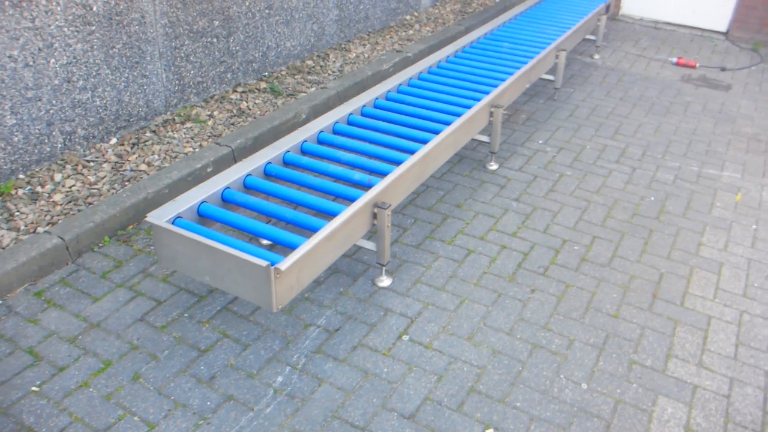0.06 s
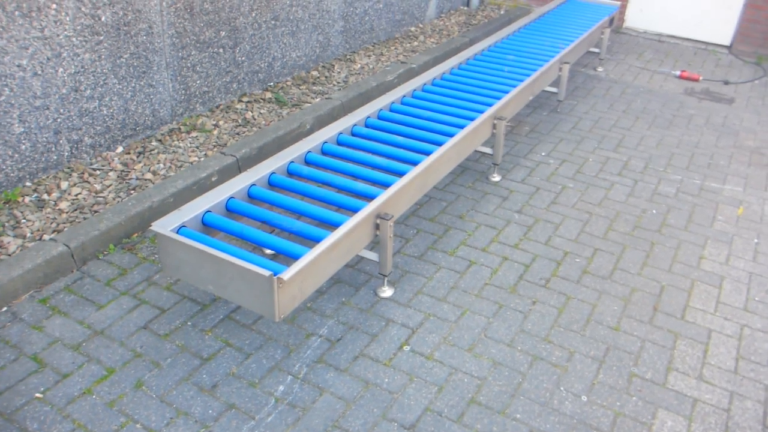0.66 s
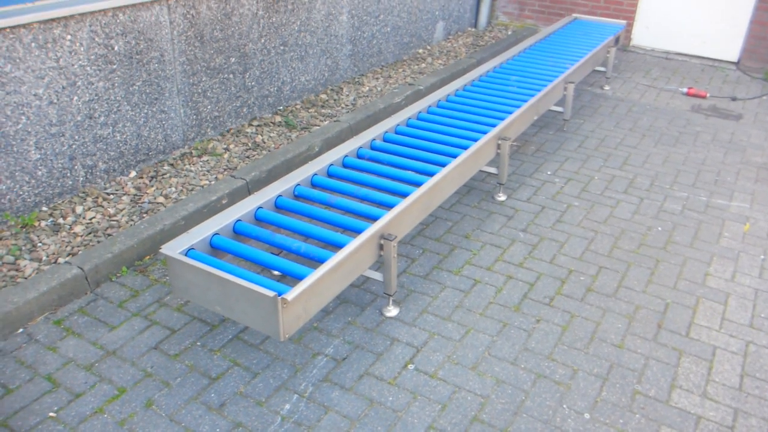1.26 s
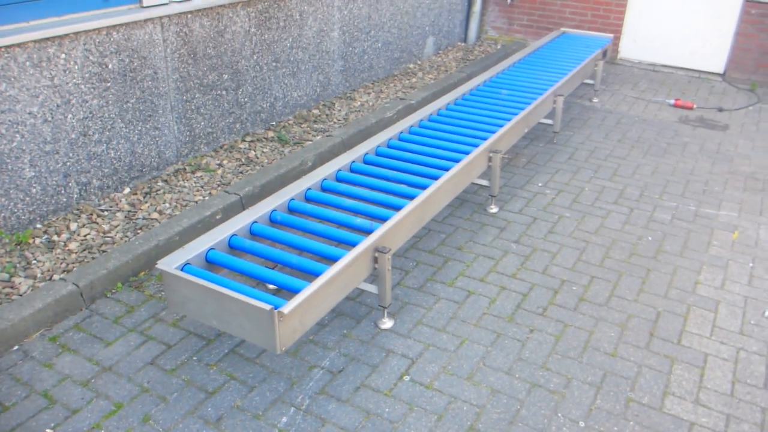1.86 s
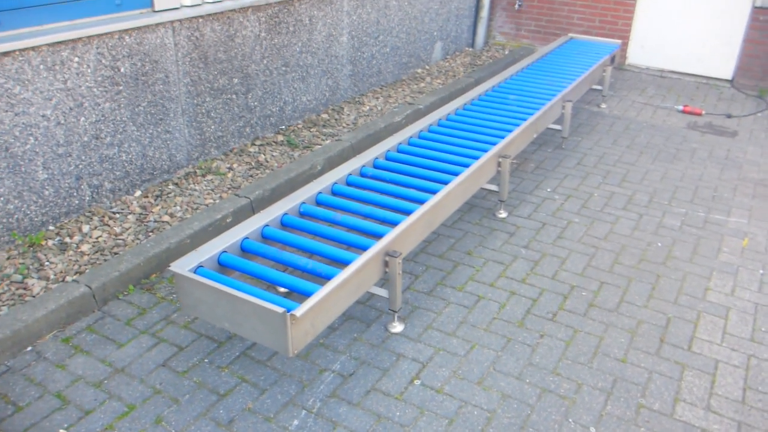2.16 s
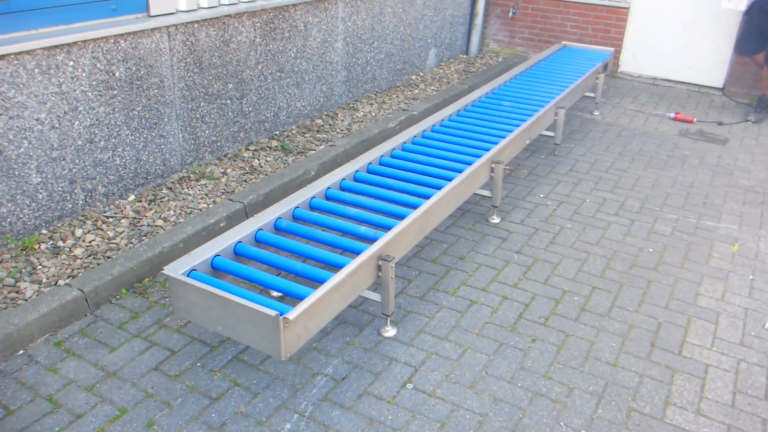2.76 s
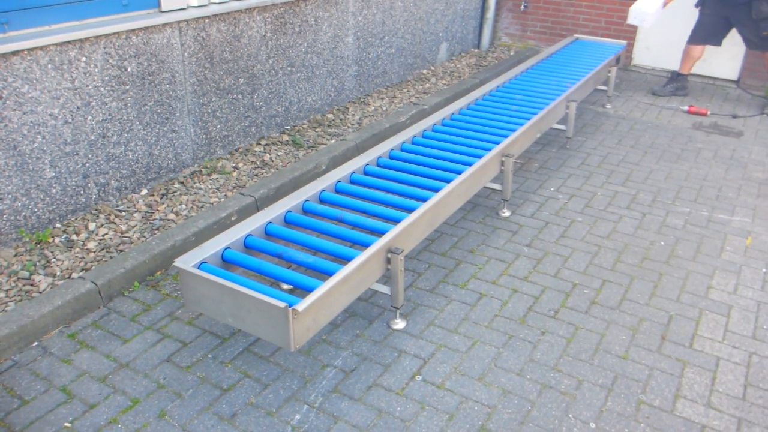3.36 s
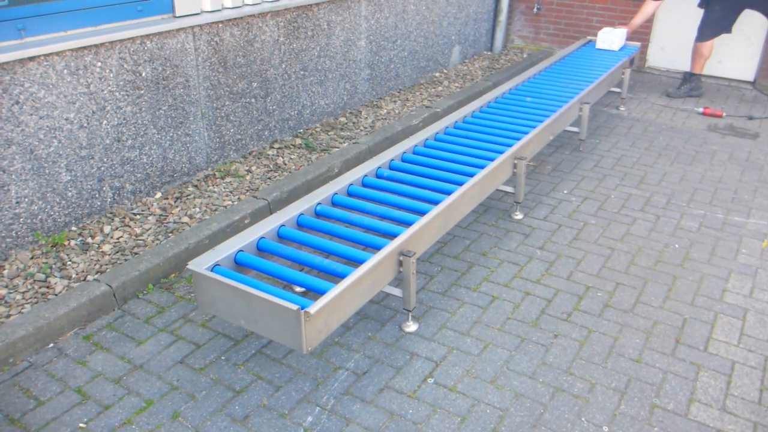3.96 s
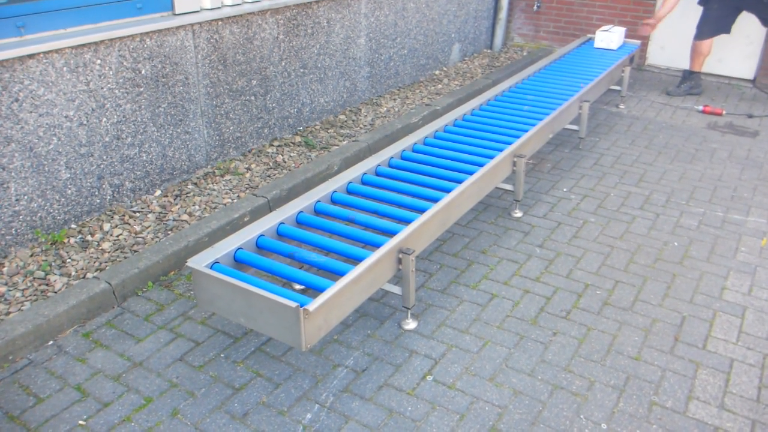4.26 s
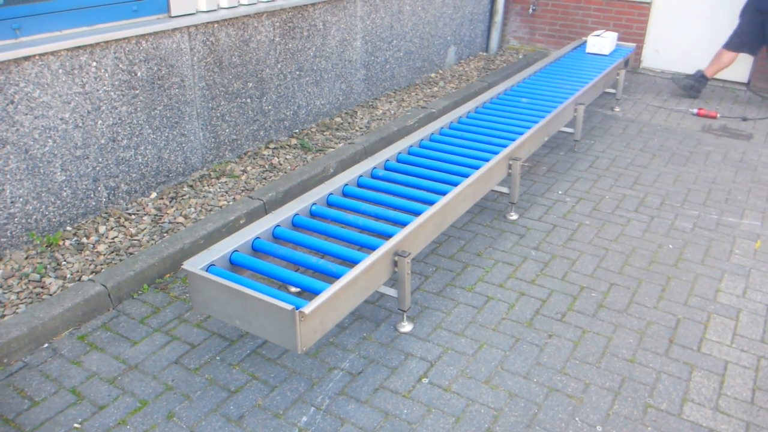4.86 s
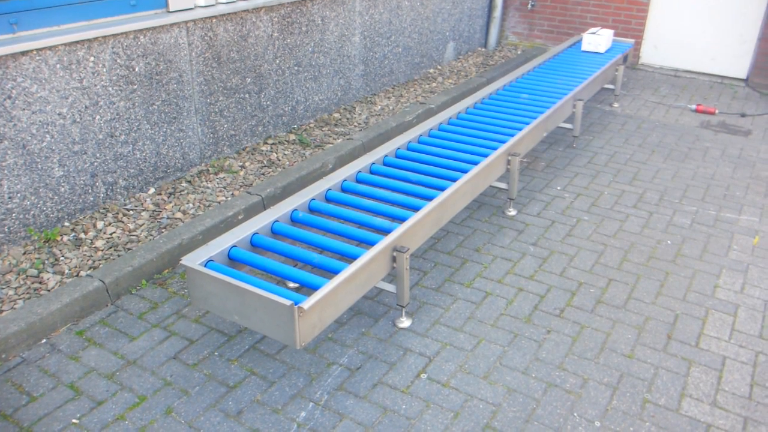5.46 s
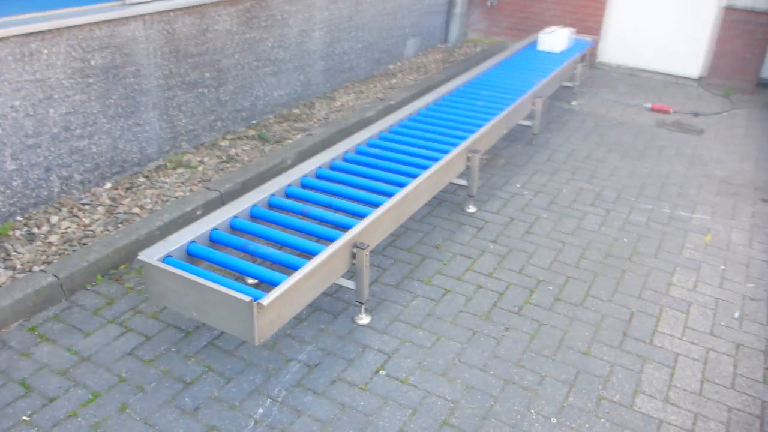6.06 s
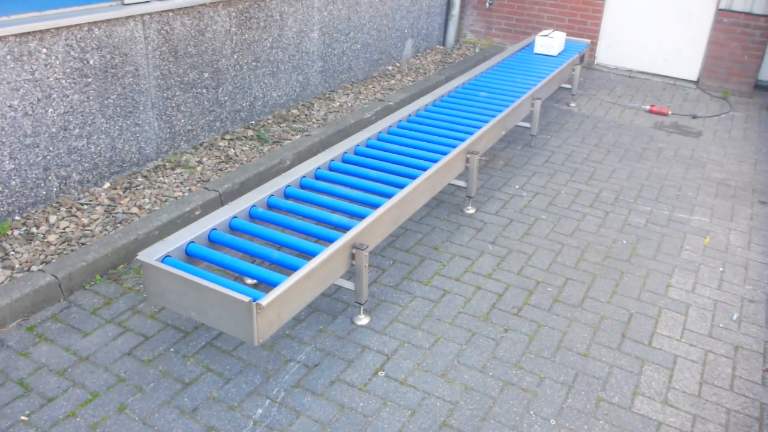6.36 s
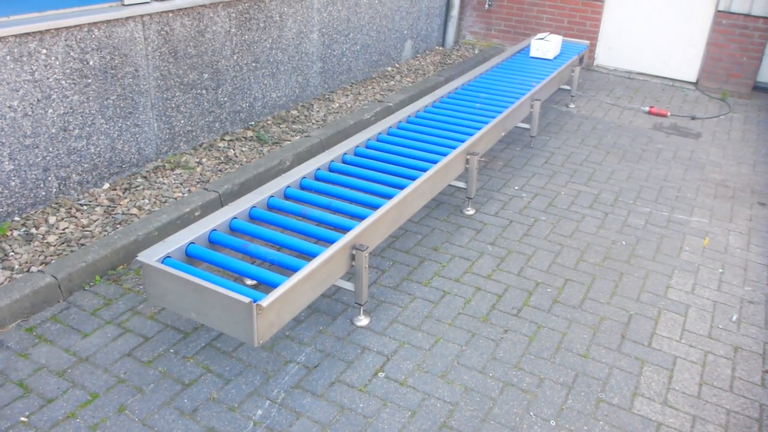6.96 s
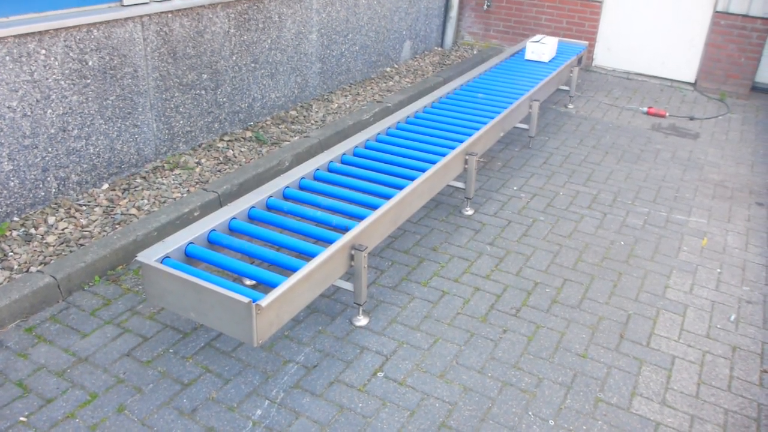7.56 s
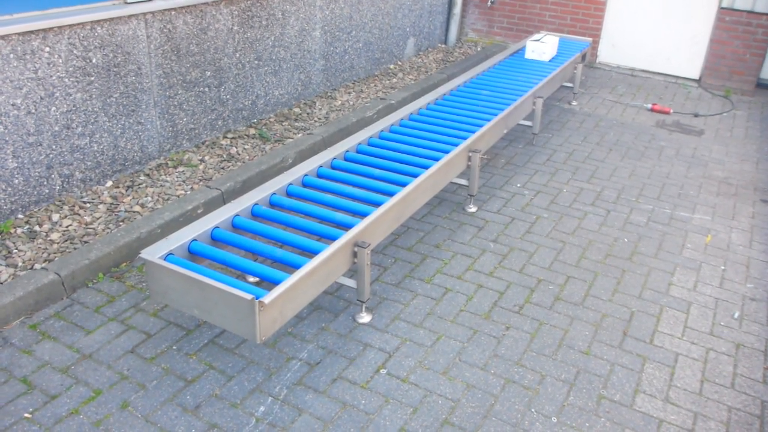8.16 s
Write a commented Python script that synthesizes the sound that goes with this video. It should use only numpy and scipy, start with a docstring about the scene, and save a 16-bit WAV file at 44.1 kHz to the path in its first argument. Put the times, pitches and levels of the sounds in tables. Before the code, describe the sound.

After a moment of silence, a powered roller conveyor is heard running in a paved yard from about 0.3 seconds. Its rollers whirr steadily in a steel frame, with a fast, regular chatter, small metallic ticks and a faint high motor whine. Sharp clicks sound close to the microphone at about 0.7 and 1.5 seconds, the later ones followed by a quick cluster of dull bumps and a brush. From around 2 to 3 seconds a low traffic rumble swells behind, with engine drones gliding up and down, and stays to the end. The conveyor gets slightly louder at 3.4 seconds as it takes a box. Light brushing sounds come at about 4, 4.8, 5.5 and 5.8 seconds. At 6.1 seconds one loud, close clack makes everything dip in level and partly recover. Faint clicks follow at 6.8 and 7.6 seconds, with conveyor and traffic continuing until just past 8 seconds.

```python
"""In a paved yard, a powered roller conveyor runs, a little louder once it carries a box.
Its rollers whirr in the steel frame and chatter once every turn of the drive; loose axles tick
and the motor whines faintly. Behind it a low rumble with gliding engine drones swells up, likely
traffic beyond the wall. A few clicks, bumps, brushing sounds and one loud clack come from close by.
The clack makes an automatic gain control turn everything down for a while."""
import sys
import numpy as np
from scipy import signal
from scipy.fft import rfft, irfft
from scipy.io import wavfile
from scipy.ndimage import uniform_filter1d

SR = 44100
rng = np.random.default_rng(int(sys.argv[2]) if len(sys.argv) > 2 else 0)


def unload_wav(signal):
    """Save mono or channel-first audio to the path in sys.argv[1] as 16-bit WAV at rate SR, clipped to [-1, 1]."""
    wavfile.write(
        sys.argv[1],
        SR,
        np.round(np.clip(np.atleast_2d(signal).T, -1, 1) * 32767).astype(np.int16),
    )


N = 362061
T, HZ = np.arange(N) / SR, np.fft.rfftfreq(N, 1 / SR)
TURNS_PER_S, CHATTER_PEAK_S = 14.0, .04  # the drive's speed; when one chatter is strongest

# Levels in the tables are relative. A ring time is how long a tone takes to fall by 60 dB.
# how unlike the two microphones sound: f/Hz, unshared over shared sound/dB
STEREO_WIDTH = [(100, -34.5), (250, -40.5), (430, -19.5), (660, -23), (950, -10), (2500, -10), (4600, -5.5),
                (10000, -10.5)]
# which microphone is louder: f/Hz, left minus right/dB
STEREO_LEAN = [(400, 0), (1000, .7), (2800, 1), (4600, 2.5), (9000, 0)]

# tone colour of the traffic's rumble: f/Hz, level/dB
RUMBLE_SPECTRUM = [(35, -39), (66, -13), (92, -5.5), (135, 7), (160, -0.5), (192, 9), (225, 3.5),
                   (265, 8.5), (365, 5), (405, 0), (445, 1.5), (600, -11.5), (1100, -15), (4000, -96)]
# the rumble as the traffic draws near, then stays: t/s, level/dB
RUMBLE_SWELL = [(.3, -66), (.8, -47), (1.7, -46), (2.1, -48), (3.3, -38), (6, -37.5), (8.21, -37)]
# how three engines change in pitch and loudness: t/s, f/Hz, level/dB
CRUISING_COURSE = [(2.1, 35, -59), (3.1, 57.5, -58), (3.6, 60.5, -55), (3.9, 64, -49.5), (4.4, 69.5, -56),
                   (5.6, 67.5, -54.5), (6.5, 65, -49.5), (7.1, 77.5, -59), (8.21, 77, -49)]
SPEEDING_COURSE = [(5.1, 96.84, -61.5), (5.9, 105.5, -41.5), (6.4, 111, -46), (6.8, 120, -41.5),
                   (7.6, 126.1, -42.5), (8.21, 124.4, -40.5)]
SLOWING_COURSE = [(2.5, 62.2, -53.5), (3, 60.75, -43), (3.4, 60.16, -45.5), (4.15, 59.8, -47),
                  (4.42, 59.28, -36), (6.05, 59.3, -41.5), (6.4, 56.76, -49.5), (7.5, 53, -40.5),
                  (8.21, 50.7, -47)]
# the tones of each engine: multiple of its pitch, level/dB, roughness from 0 to 1
CRUISING_TONES = [(1, 0.13, .08), (2, -0.13, 0.22), (3, -1.7, 0.14)]
SPEEDING_TONES = [(1, 0.5, 0.12), (2, -3.5, 0.31)]
SLOWING_TONES = [(3.5, -12, 0.31), (5, -4, 1), (6, 2, 0.29)]
# standing waves between the walls lift a tone that glides through them: f/Hz, width/Hz, lift/dB
YARD_RESONANCES = [(70.8, 7.5, 6), (128, 28, 5.5), (190, 10.8, 15.5), (253, 12, 5)]

# tone colour of a contact: f/Hz, level/dB
CONTACT_SPECTRUM = [(60, -49), (290, -14), (560, -10.5), (1050, -9), (1500, -12), (1950, -5), (2650, -19.5),
                    (3200, -1), (4400, -8.5), (5400, -30), (6500, -32.5), (7800, -42.5), (9900, -28.5),
                    (12400, -48), (14000, -59), (15700, -61)]
# ringing after a contact: f/Hz, level/dB, ring time/s
CONTACT_RING = [(1460, -36.5, 0.064), (1600, -54, .1), (1900, -47, .06), (2045, -52, 0.23),
                (3130, -45, 0.079), (4020, -46, .1), (4520, -52.5, 0.21), (6250, -66, .15)]
# sharp clicks: t/s, level/dB, resonance f/Hz, its lift/dB, treble/dB, left minus right/dB
CLICK_HITS = [ (0.6531, -3, 3880, 11, 12, -3), (0.6666, -16, 1880, 19, 4, 11),
              (0.9767, -18.5, 5130, 8, 10, 4), (1.475, -5.5, 1850, 14, 7, 12),
              (1.4763, -6.5, 5100, 20.5, 4.5, -13), (6.762, -18, 3800, 6, 4, 4),
              (7.552, -24, 3800, 6, 5, -3)]
# dull bumps: t/s, level/dB
BUMP_HITS = [(1.4856, -10.5), (1.5544, -14), (1.561, -14), (1.5685, -11)]
# light brushing sounds: t/s, level/dB, decay/s
BRUSH_STROKES = [(0.704, -25, .002), (1.542, -18, 0.089), (4.0235, -13.5, .008), (4.04, -20, 0.074),
                 (4.793, -26, .02), (5.521, -25.5, .05), (5.8148, -23, .008)]
# the parts of the loud clack: t/s, level/dB, thud/dB, body/dB, decay/s, left minus right/dB
CLACK_HITS = [(6.1418, -5.5, 15, 17.5, 0.0055, -11), (6.1499, 19, -9, -7, 0.002, 3),
              (6.1615, -6, -3, 13, 0.003, -11)]

# the motor's whine: f/Hz, level/dB
MOTOR_TONES = [(2342, -62.5), (6960, -96.5)]
# ringing of a roller's axle: f/Hz, level/dB, ring time/s
AXLE_RING = [(1760, -4, 0.0046), (2670, 6, 0.034), (3410, 4, 0.022), (4420, 3, 0.015)]
# pitches that the steel frame brings out: f/Hz, width/Hz, lift/dB
FRAME_RESONANCES = [(552, 150, 8.5), (627.4, 24, 5), (679, 67, 9), (751, 36, 4), (1660, 300, 3),
                    (2105, 89, 5), (2945, 87, 5), (3520, 78, 4), (4320, 120, 4), (6840, 180, 5)]
# tone colour of the rollers' steady whirr: f/Hz, level/dB
WHIRR_SPECTRUM = [(30, -41), (65, 1), (130, 10.5), (430, 0.5), (730, 3.5), (900, 0.5), (3600, -6),
                  (4500, -18), (6100, -33), (8300, -44), (9700, -34), (10800, -36), (12000, -49.5),
                  (15500, -49)]
# tone colour of the rollers chattering in their seats: f/Hz, level/dB
CHATTER_SPECTRUM = [(300, -13), (650, 1.5), (1000, -3.5), (1650, 2), (2300, -1), (3500, 2), (4000, -4.5),
                    (4400, -11), (5400, -18.5), (6500, -36.5), (8300, -43), (10000, -28), (13000, -53)]


def amp(db):
    """Turns decibels into a factor to multiply by."""
    return 10 ** (np.asarray(db) / 20)


def unit(x):
    """Scales a signal to an average strength (rms) of one."""
    return x / np.sqrt(np.mean(x ** 2) + 1e-20)


def read(points, hz):
    """Reads between the rows of a frequency table, with octaves evenly spaced."""
    f, value = np.transpose(points)
    return np.interp(np.log(hz + 1), np.log(f), value)


def resonance_db(peaks, hz):
    """The lift that resonances give at these frequencies."""
    return sum(db / (1 + (2 * (hz - centre) / width) ** 2) for centre, width, db in peaks)


def wander(rate_hz, size=4096):
    """A smooth random wobble; a higher rate makes it quicker."""
    hz = np.fft.rfftfreq(size, T[-1] / size)
    slow = irfft(rfft(rng.standard_normal(size)) * np.exp(-(hz / rate_hz) ** 2), size)
    return np.interp(T, np.linspace(0, T[-1], size), unit(slow))


def tap_response(gain, size=4096):
    """The shortest response to a tap that has this tone colour."""
    log_gain = np.log(np.r_[gain, gain[-2:0:-1]] + 1e-6)
    return irfft(np.exp(np.conj(signal.hilbert(log_gain)))[:len(gain)], size)


def at_microphones(pair, colour_db, width_db=0):
    """Colours two unrelated signals and blends them into left and right, most alike in the bass."""
    shared, apart = rfft(pair, axis=1) * amp(colour_db)
    side = apart * amp(read(STEREO_WIDTH, HZ) + width_db)
    lean = amp(read(STEREO_LEAN, HZ) / 2)
    return unit(irfft(np.array([(shared + side) * lean, (shared - side) / lean]), N, axis=1))


def traffic_rumble(lump_db=1):
    """Traffic makes a lumpy low roar that swells from afar."""
    roar = at_microphones(rng.standard_normal((2, N)), read(RUMBLE_SPECTRUM, HZ), width_db=-1)
    return roar * amp(np.interp(T, *np.transpose(RUMBLE_SWELL)) + lump_db * wander(24))


def engine(course, tones, level_db=-1.0, blur_hz=9, low_cut_hz=59):
    """Tones glide with an engine's speed, partly blurred by their many paths between the walls."""
    times, pitches, levels = np.transpose(course)
    pitch, db = np.interp(T, times, pitches), np.interp(T, times, levels)
    out = np.zeros(N)
    for multiple, tone_db, rough in tones:
        hz = multiple * pitch
        phase = 2 * np.pi * np.cumsum(hz) / SR
        blurred = np.cos(phase) * wander(blur_hz) + np.sin(phase) * wander(blur_hz)
        tone = np.sqrt(2 * (1 - rough)) * np.cos(phase) + np.sqrt(rough) * blurred
        heard = 1 / np.hypot(1, (low_cut_hz / hz) ** 8)  # the microphones miss the lowest tones
        out += tone * heard * amp(tone_db + resonance_db(YARD_RESONANCES, hz))
    fade = np.clip(1 + 10 * np.minimum(T - times[0], times[-1] - T), 0, 1)
    return out * fade * amp(db + level_db)


def contact(start_s, db, ring_hz, thud_db, body_db, treble_db, decay_s, scrape_share, pan_db=0,
            scatter=0.47, thud_hz=600, body_hz=2400, treble_hz=6500, lift_db=10, lift_width_hz=650,
            overtone=1.69, overtone_db=9, echo_db=-18, echo_s=0.061, size=4096):
    """A contact is a snap and a brief scrape; the struck shell rings and the yard answers faintly."""
    t, hz = T[:SR // 3], np.fft.rfftfreq(size, 1 / SR)
    common, apart, *air = rng.standard_normal((4, len(t)))
    scrape = (common + scatter * np.array([apart, -apart])) * np.exp(-t / decay_s)
    snap = np.sqrt(1 - scrape_share) * (t == 0)
    push = snap + np.sqrt(scrape_share) * scrape / np.linalg.norm(scrape[0])
    echo = np.array(air) * amp(-60 * t / echo_s)
    echo *= amp(echo_db) / np.linalg.norm(echo[0])
    # the place of contact brings out one resonance and its overtone
    peaks = [(ring_hz, lift_width_hz, lift_db), (overtone * ring_hz, lift_width_hz, overtone_db)]
    colour = unit(amp(read(CONTACT_SPECTRUM, hz) + resonance_db(peaks, hz)))
    low, middle, high = (1 / (1 + (hz / edge) ** 8) for edge in (thud_hz, body_hz, treble_hz))
    balance_db = thud_db * low + body_db * (middle - low) + treble_db * (1 - high)
    shell = tap_response(colour * amp(balance_db))
    hit = signal.fftconvolve(push + echo, shell[None], axes=1)[:, :len(t)]
    ring = sum(amp(tone_db - 60 * t / ring_s) * np.sin(2 * np.pi * f * t)
               for f, tone_db, ring_s in CONTACT_RING)
    ring *= 1 - np.exp(-t / 0.00116)  # a soft start
    sound = (hit + ring) * amp([[db + pan_db / 2], [db - pan_db / 2]])
    out = np.zeros((2, N))
    slot = out[:, round(start_s * SR):][:, :len(t)]
    slot += sound[:, :slot.shape[1]]
    return out


def clicks():
    """Short, bright contacts, each with its own ring."""
    return sum(contact(s, db, hz, thud_db=-14, body_db=-1.5, treble_db=treble, decay_s=.0011,
                       scrape_share=1.0, pan_db=pan, treble_hz=4660, lift_db=lift, overtone_db=-2)
               for s, db, hz, lift, treble, pan in CLICK_HITS)


def bumps():
    """Soft contacts that are mostly thud."""
    return sum(contact(s, db, ring_hz=2830, thud_db=29, body_db=4, treble_db=4, decay_s=0.0046,
                       scrape_share=0.2, lift_db=18.5, overtone_db=-2) for s, db in BUMP_HITS)


def brushes():
    """Grazing contacts that are mostly scrape and treble."""
    return sum(contact(s, db, ring_hz=3760, thud_db=2, body_db=11, treble_db=16.5, decay_s=decay,
                       scrape_share=.96) for s, db, decay in BRUSH_STROKES)


def clack():
    """Three hard contacts in a quick row: a touch, a slam and a rebound."""
    return sum(contact(s, db, ring_hz=3880, thud_db=thud, body_db=body, treble_db=-11.5, decay_s=decay,
                       scrape_share=0.62, pan_db=pan, scatter=0.26, treble_hz=7300, lift_db=4,
                       lift_width_hz=1300, overtone=1.44, overtone_db=7)
               for s, db, thud, body, decay, pan in CLACK_HITS)


def conveyor_db(empty_db=-44.5, load_db=1.5, box_on_s=3.41, loading_s=0.085):
    """The conveyor runs evenly, a little louder once it carries the box."""
    return empty_db + load_db * np.clip((T - box_on_s) / loading_s, 0, 1)


def motor(waver=0.00178, flutter_db=4.0):
    """Thin, high tones waver with the motor's speed."""
    clock = np.cumsum(1 + waver * wander(24.0)) / SR
    return sum(amp(db + flutter_db * wander(26)) * unit(np.sin(2 * np.pi * hz * clock))
               for hz, db in MOTOR_TONES)


def axles(level_db=-11, ticks_per_s=45, spread_db=-3.5, lead_turns=.12, rise_s=0.00051, rollers=24):
    """Loose axles tick on the frame, mostly as each chatter begins; each has its own pitch and side."""
    t, out = T[:SR // 30], np.zeros((2, N))
    turn = TURNS_PER_S * (T - CHATTER_PEAK_S) + lead_turns
    chance = (1 + np.cos(2 * np.pi * turn)) * ticks_per_s / rollers / SR
    for _ in range(rollers):
        tuning, pan_db = rng.uniform(.92, 1.05), rng.normal(2, 3)
        ring = sum(amp(db - 60 * t / ring_s) * np.sin(2 * np.pi * (hz * tuning * t + rng.random()))
                   for hz, db, ring_s in AXLE_RING)
        tick = unit(ring * (1 - np.exp(-(t / rise_s) ** 2)))
        blows = (rng.random(N) < chance) * amp(spread_db * np.minimum(rng.exponential(1, N), 2))
        out += amp([[pan_db / 2], [-pan_db / 2]]) * signal.oaconvolve(blows, tick)[:N]
    return unit(out) * amp(conveyor_db() + level_db)


def chatter(level_db=-0.5, throb_db=5, uneven_db=2.27, ticks_per_s=700, spread_db=4.0, rub=0.31,
            slip_turns=0.16):
    """Once a turn the rollers shift in their seats: a cluster of small ticks over a rubbing noise."""
    turn = TURNS_PER_S * (T - CHATTER_PEAK_S) + slip_turns * wander(3.5)
    force = amp(throb_db * np.cos(2 * np.pi * turn) + uneven_db * wander(6.4))
    sizes = amp(spread_db * np.minimum(rng.exponential(1, (2, N)), 3.6)) * rng.choice([-1, 1], (2, N))
    ticks = unit(sizes * (rng.random((2, N)) < ticks_per_s / SR))
    shaking = force * (ticks + rub * rng.standard_normal((2, N)))
    colour_db = read(CHATTER_SPECTRUM, HZ) + resonance_db(FRAME_RESONANCES, HZ)
    return at_microphones(shaking, colour_db) * amp(conveyor_db() + level_db)


def whirr(level_db=5, waver_db=0.2):
    """All rollers together make an even rush in the frame."""
    colour_db = read(WHIRR_SPECTRUM, HZ) + resonance_db(FRAME_RESONANCES, HZ)
    rush = at_microphones(rng.standard_normal((2, N)), colour_db)
    return rush * amp(conveyor_db() + level_db + waver_db * wander(17.7))


def scene():
    """The conveyor, the traffic behind it and the close knocks."""
    conveyor = whirr() + chatter() + axles() + motor()
    engines = (engine(CRUISING_COURSE, CRUISING_TONES) + engine(SPEEDING_COURSE, SPEEDING_TONES)
               + engine(SLOWING_COURSE, SLOWING_TONES))
    traffic = traffic_rumble() + engines
    knocks = clicks() + bumps() + brushes() + clack()
    return traffic + knocks + conveyor


def record(dry, threshold_db=-17, lag_s=0.00074, switch_on_s=0.3065, cutoff_hz=15700):
    """Gain control turns the sound down after a loud peak; part comes back quickly, the rest creeps."""
    power_db = 10 * np.log10(abs(uniform_filter1d((dry ** 2).mean(0), size=64)) + 1e-12)
    duck_db = np.zeros(N)
    for share, fall_db_per_s in [(0.23, 38), (0.21, 2.0)]:  # the quick part, the slow part
        fall_db = T * fall_db_per_s
        held_peak_db = np.maximum.accumulate(power_db + fall_db) - fall_db
        duck_db += share * np.maximum(held_peak_db - threshold_db, 0)
    smoothing = np.exp(-1 / (lag_s * SR))
    ducked = dry * amp(-signal.lfilter([1 - smoothing], [1, -smoothing], duck_db))
    live = np.clip(ducked, -.95, .95) * (T >= switch_on_s)  # overload flattens peaks; silent at first
    treble_cut = signal.firwin(511, cutoff_hz, window=("kaiser", 9), fs=SR)
    return signal.oaconvolve(live, treble_cut[None], "same")


dry = scene()
out = record(dry)
unload_wav(out)
```